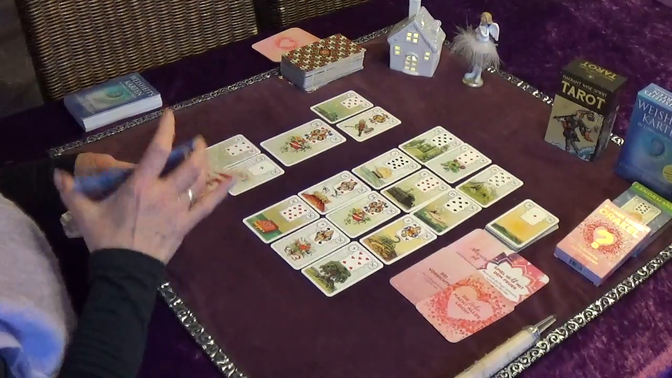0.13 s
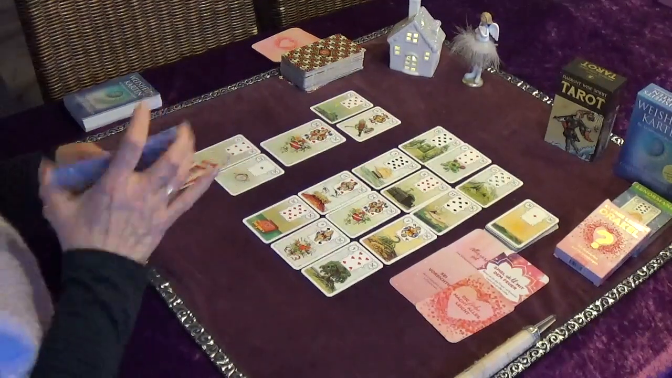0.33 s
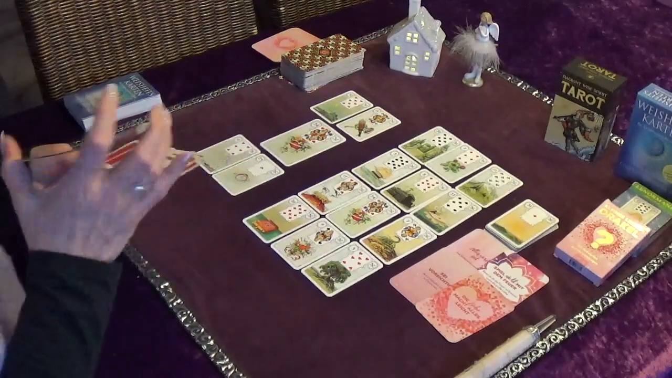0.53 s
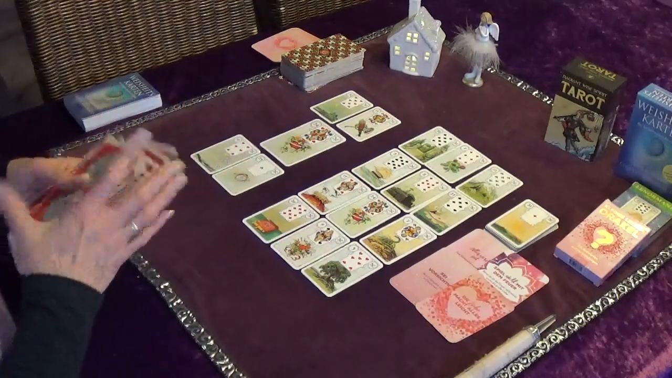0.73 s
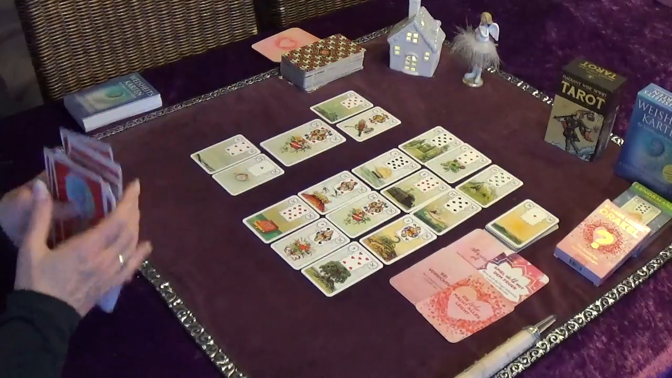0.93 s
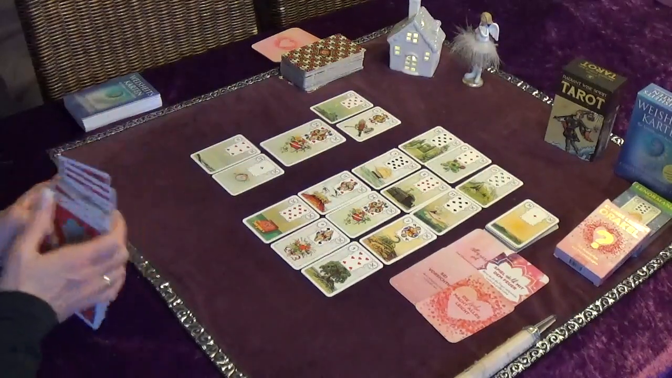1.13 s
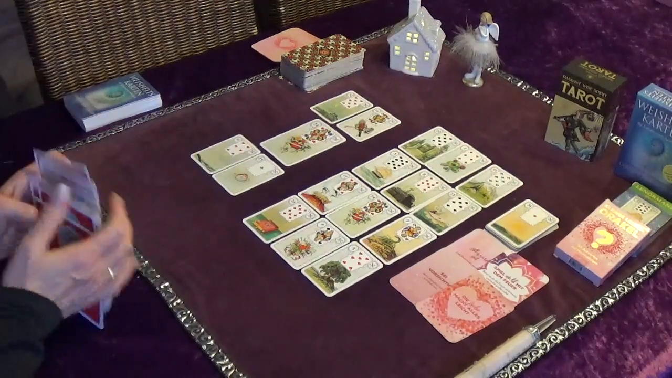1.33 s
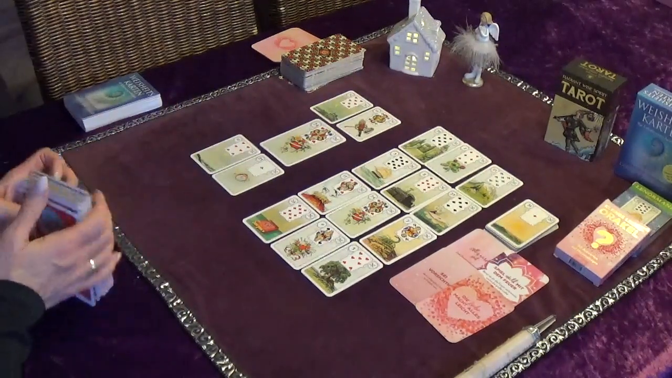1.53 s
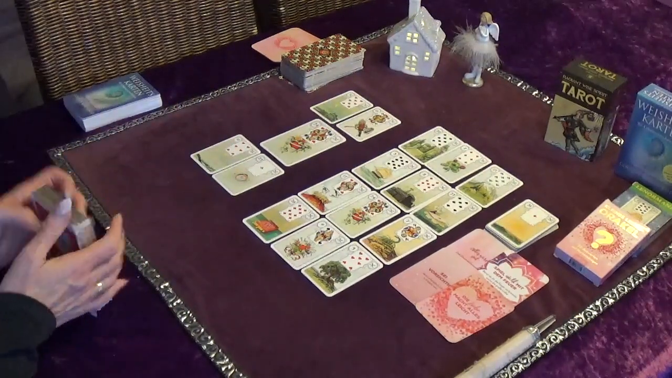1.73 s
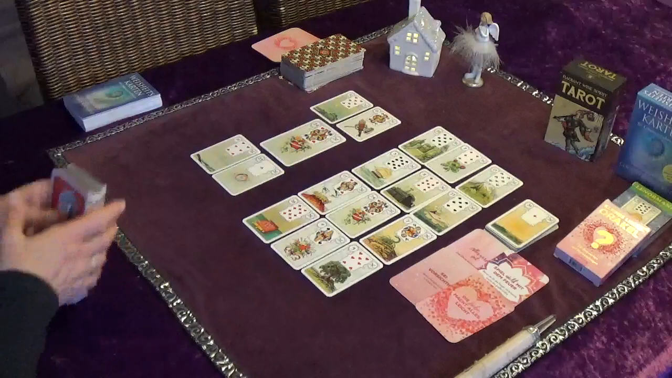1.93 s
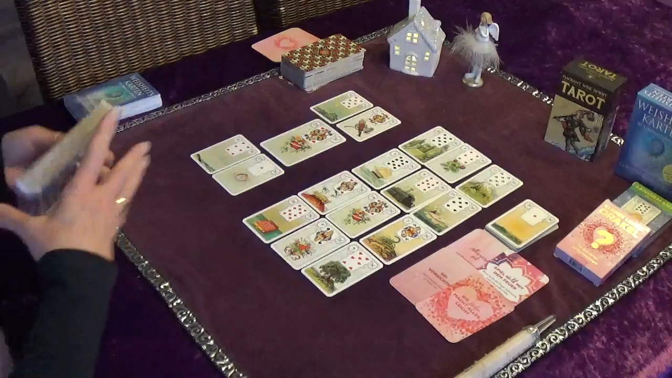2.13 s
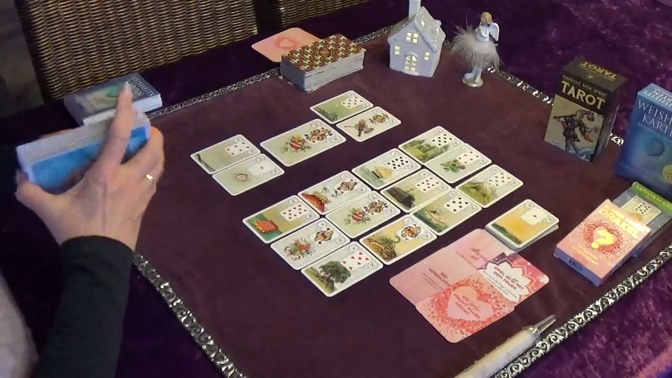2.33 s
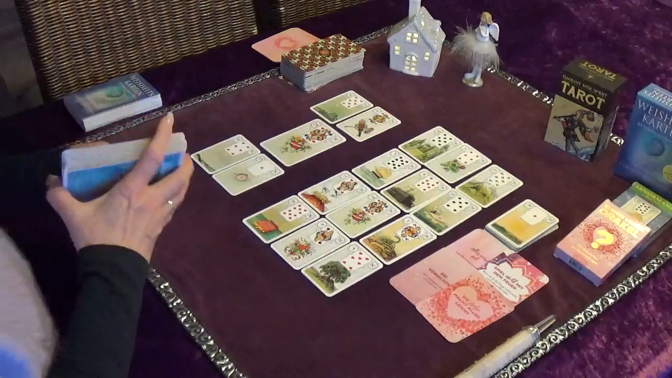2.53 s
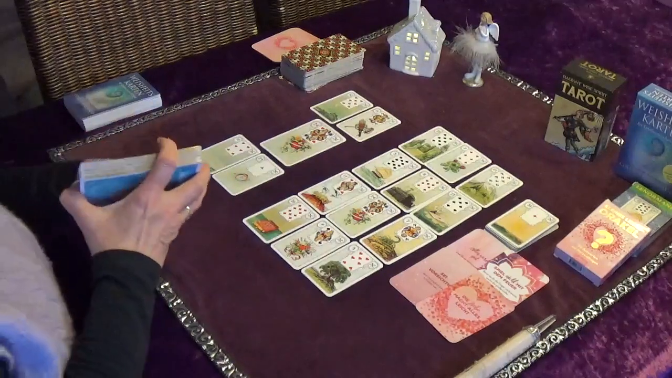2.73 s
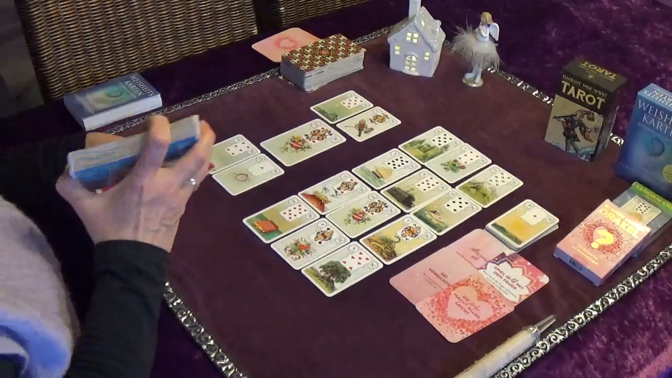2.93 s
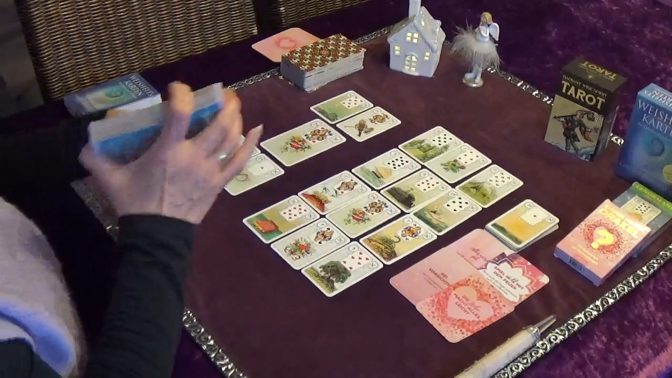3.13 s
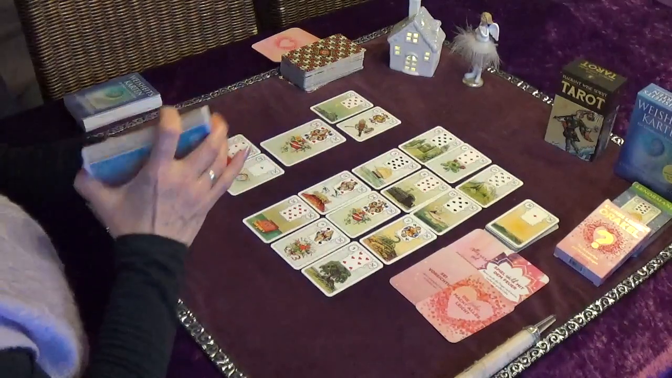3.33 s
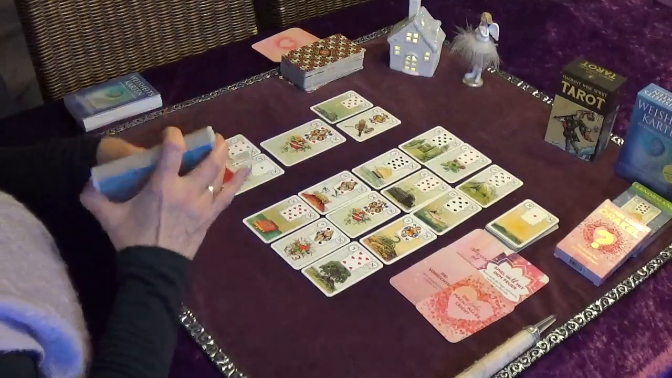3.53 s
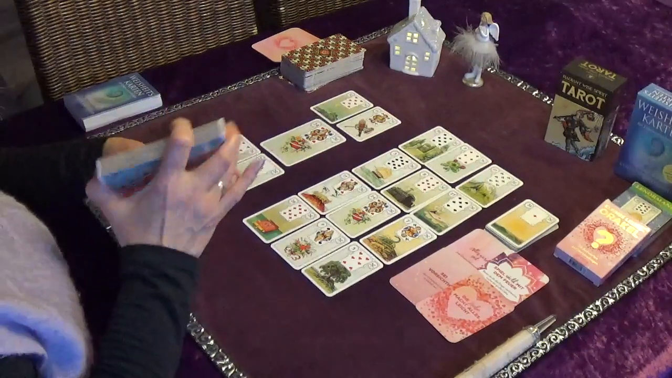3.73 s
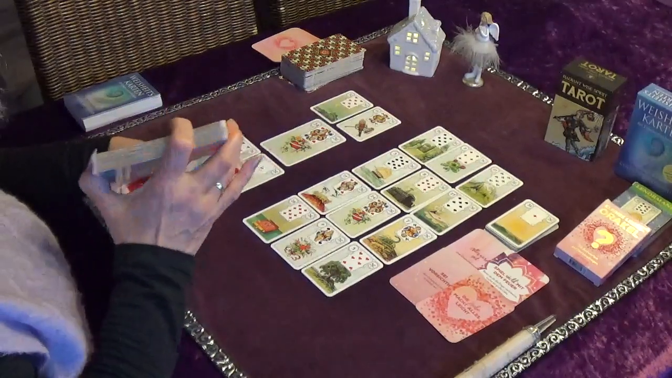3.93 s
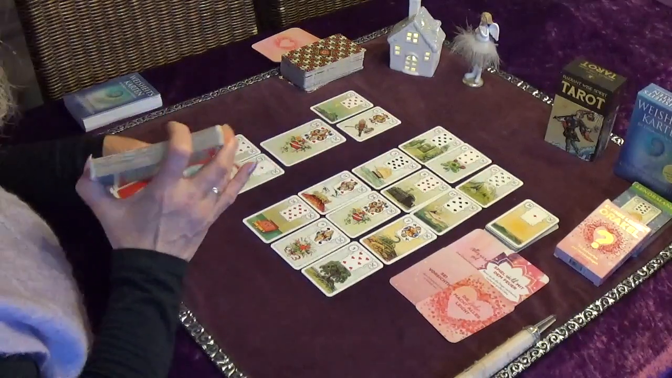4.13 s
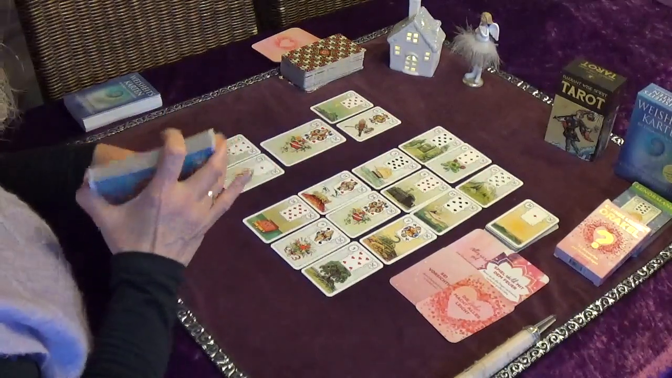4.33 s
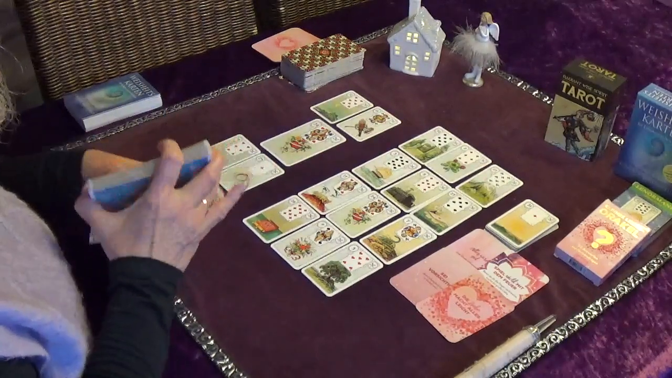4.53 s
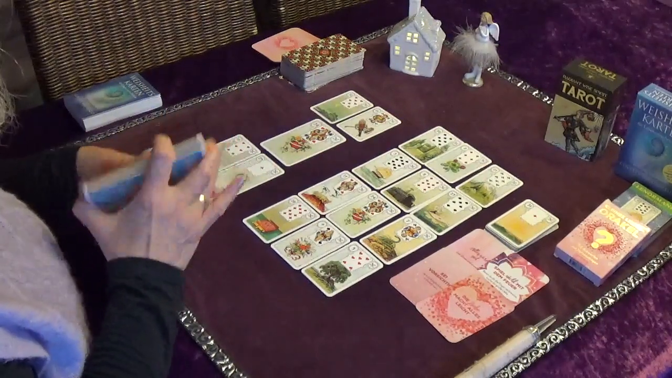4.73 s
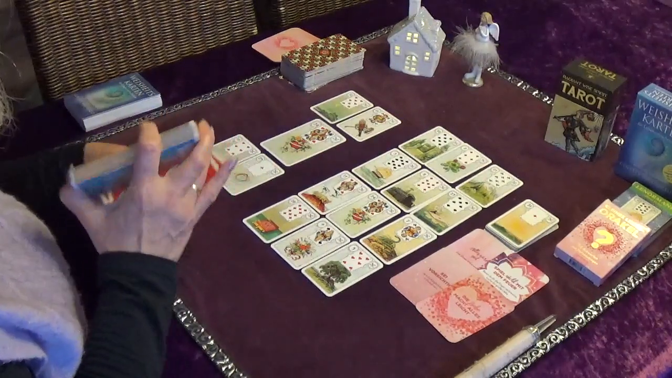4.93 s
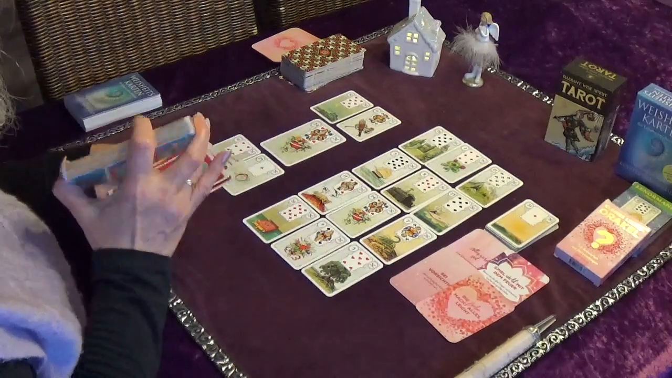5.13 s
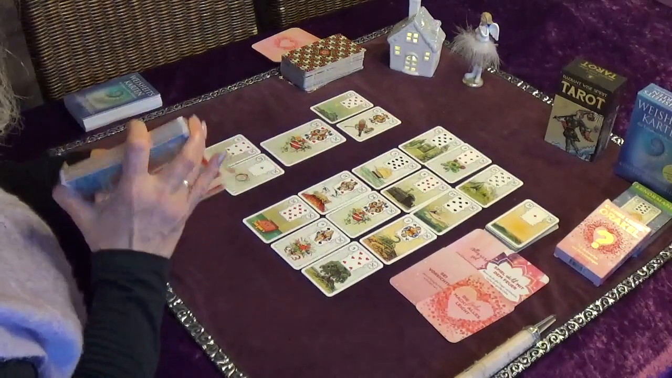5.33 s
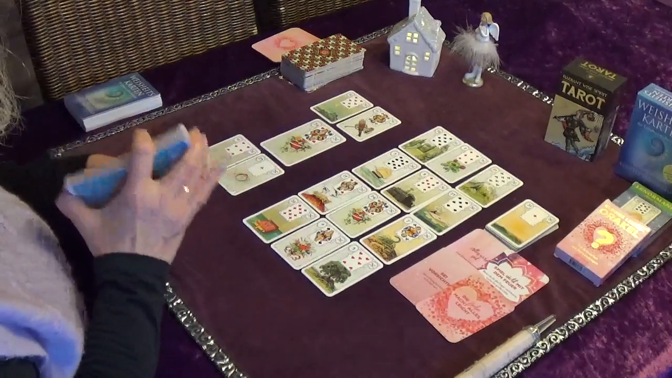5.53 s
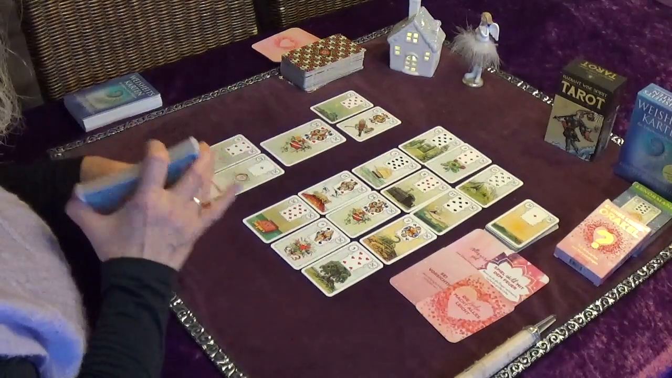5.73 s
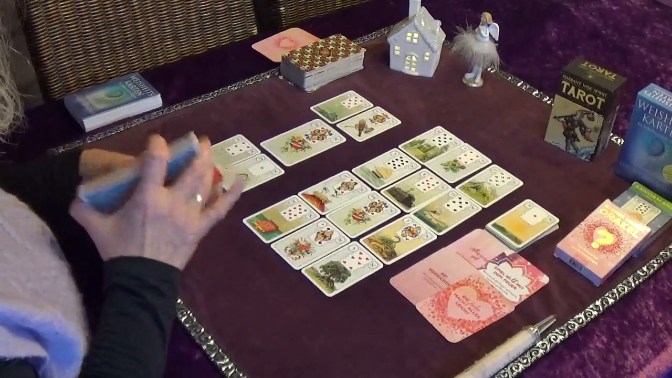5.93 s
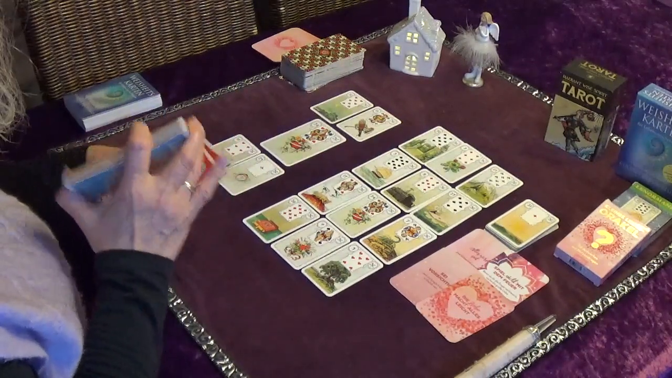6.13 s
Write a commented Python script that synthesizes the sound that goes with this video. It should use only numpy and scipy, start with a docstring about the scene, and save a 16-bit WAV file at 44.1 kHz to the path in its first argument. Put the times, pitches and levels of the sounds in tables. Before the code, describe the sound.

In a small, lively room, cards slap and slide together for a moment as someone shuffles them near the microphone. Several woody knocks follow as the deck is squared on a tabletop, then soft rubbing and a brief rest. The shuffling starts again and keeps going, a quick, regular run of crisp snaps and papery hiss over a faint low background.

```python
"""Cards rustle and snap as a deck is shuffled overhand above a cloth-covered table in a small, lively room.
In each stroke, about four a second, a packet strikes the deck edge-on, then a few cards peel off and land.
Friction makes the papery hiss, impact the snaps, and air squeezed from under the cards a falling puff.
Early on the deck is knocked square on the table, whose modes boom; after a short rest the shuffle goes on.
The table top and the walls reflect the sound over a faint rumble."""
import sys
import numpy as np
from scipy import signal
from scipy.fft import rfft, irfft, next_fast_len
from scipy.io import wavfile
from scipy.ndimage import map_coordinates

SR = 44100
rng = np.random.default_rng(int(sys.argv[2]) if len(sys.argv) > 2 else 0)


def pcm_store(signal):
    """Save signal as 16-bit PCM."""
    levels = np.round(np.clip(np.atleast_2d(signal), -1, 1) * 32767)
    wavfile.write(sys.argv[1], SR, levels.astype(np.int16).T)


N = 276590

# Spectra of the sources. Each row: frequency in Hz, relative spectral level in dB.
BACKGROUND_SPECTRUM = [(12, -37), (20, -11), (59, -2.5), (77, -17.5), (165, -9.5), (199, -4), (221, -13.5),
                       (463, -13.5), (542, -20.5), (3270, -24), (3830, -27), (7600, -28.5), (11000, -34.5),
                       (14300, -83), (22000, -120)]
TABLE_SPECTRUM = [(40, -43), (75, -22), (110, -14.5), (230, -11), (380, -4.5), (550, -4), (850, -2.5),
                  (1300, -3), (2100, -4.5), (3200, -7), (6000, -9.5), (11000, -20)]
CLACK_SPECTRUM = [(300, -26), (1200, -5), (3000, -0.5), (4200, -15.5), (6000, -24.5), (11000, -43.5)]  # card edges on the table
HISS_SPECTRUM = [(1500, -44), (3500, -3.5), (4800, 1.5), (7000, 0.5), (9300, -1), (11000, -9.5)]  # light sliding
RASP_SPECTRUM = [(50, -23), (130, -9), (300, 2.5), (550, -5), (900, -5.5), (1350, 0), (2200, -2), (3300, 0),
                 (4400, -8.5), (6500, -7.5), (11000, -39.5)]  # firm sliding
TICK_SPECTRUM = [(1500, -41.5), (3500, -0.5), (4700, 3.5), (7500, 0.5), (9500, -6), (11000, -14)]  # a packet's edges
SLAP_SPECTRUM = [(400, -52.5), (950, -7), (1300, 10), (1750, 3.5), (2300, 5), (3300, 5), (4000, -7),
                 (4700, -2.5), (6500, -29), (11000, -64)]  # its face
THUD_SPECTRUM = [(50, -22.5), (130, -18.5), (250, -6), (450, 2), (650, 0), (900, -3.5), (1150, 0),
                 (1600, -45.5), (4000, -30.5)]  # the deck in the palm
# Reverberation. Each row: frequency in Hz, time to decay by 60 dB in seconds.
ROOM_T60 = [(100, 0.64), (250, 0.52), (600, 0.41), (1500, 0.44), (3700, 0.38), (10000, 0.34)]
# Reflection from the walls. Each row: frequency in Hz, gain in dB.
WALL_GAIN = [(100, 7), (400, -1.5), (1500, -2), (3000, -4.5), (5500, -4.5), (11000, -6)]
# Width of the diffuse field. Each row: frequency in Hz, side over mid in dB.
DIFFUSE_WIDTH = [(60, -18), (190, -19), (350, -15.5), (630, -9), (1100, -5.5), (2000, -7), (4000, -7.5),
                 (10000, -5)]
# Resonances of the table. Each row: frequency in Hz, width in Hz, peak height in dB.
TABLE_RESONANCES = [(107, 29, 15), (167, 18, 9), (220, 5.8, 14), (239, 25, 11.5), (311, 24, 9),
                    (438, 7.1, 6), (477, 8.2, 8), (530, 39, 7), (680.6, 52, 11.5), (731, 24, 5.5),
                    (957, 8.3, 0.5), (980, 17, 8.5), (1106, 9.4, 8.5), (1277, 55, 0.5), (1297, 37, 10),
                    (1400, 11, 4), (1477, 18, 8.5), (1580, 69, 4.5), (1640, 21, 9), (1860, 87, 6),
                    (2100, 47, 6.5)]
# The deck knocked on the table. Each row: start in seconds, level in dB, contact cutoff in Hz, pitch
# favoured by the spot in Hz, bass from the hand's weight in dB, relative clack level in dB.
DECK_KNOCKS = [(0.99, -30.5, 2100, 321, 3.5, -9), (1.007, -29, 1550, 450, 8, -6),
               (1.361, -40, 1800, 1000, 9, -26), (1.398, -14.5, 2490, 1183, -4.5, 2),
               (1.658, -26.5, 2250, 1530, 2, -8), (1.690, -17, 2100, 1520, -1, -2),
               (1.7042, -22.5, 3000, 1480, -11, 8), (1.741, -25, 1710, 780, 1.5, -24)]
# The hands regrip the deck, or a packet drags. Each row: time of fastest motion, rise and fall in
# seconds, level in dB, rasp over hiss in dB.
HAND_RUBS = [(0.004, 0.021, 0.039, -35.5, 11.5), (0.163, 0.016, 0.0071, -38, 10),
             (0.418, 0.0054, 0.011, -33.5, 10), (0.669, 0.0061, 0.0063, -29, 0),
             (0.876, 0.022, 0.0094, -37.5, 0.5), (0.92, 0.015, 0.031, -37, -5),
             (1.049, 0.029, 0.021, -38, 4), (1.129, 0.01, 0.042, -40, 6.5),
             (1.276, 0.007, 0.039, -48.5, -4), (1.475, 0.024, 0.015, -36, 4), (1.845, 0.062, 0.08, -46, 9),
             (2.03, 0.14, 0.066, -54.5, -8), (2.287, 0.01, 0.026, -50, -2.5),
             (2.834, 0.023, 0.08, -46.5, 3.5), (3.109, 0.016, 0.008, -32.5, 1),
             (3.335, 0.01, 0.084, -44, 8), (3.6, 0.015, 0.03, -35, 7), (3.811, 0.0064, 0.013, -25.5, -6),
             (4.562, 0.0088, 0.007, -29.5, -2), (5.271, 0.0075, 0.015, -26, -0.5),
             (5.849, 0.0082, 0.024, -23.5, -28), (5.975, 0.0067, 0.018, -31, 3),
             (6.219, 0.0069, 0.008, -32, -5), (6.256, 0.0073, 0.015, -32.5, 12)]
# Single cards catch and flick free. Each row: start in seconds, level in dB, flexing pitch in Hz,
# tick over slap in dB.
CARD_FLICKS = [(0.1303, -28, 1790, -5), (0.1494, -17.8, 2800, 2.5), (0.3937, -23, 4280, 2),
               (0.6975, -20, 2860, -24), (1.0085, -35.5, 2400, 3), (1.1184, -41, 3000, 0),
               (1.855, -36.5, 1480, 5), (2.073, -42.5, 4300, 8), (2.278, -40.5, 4300, 18),
               (2.5163, -51.5, 1200, -7), (2.7209, -51.5, 1300, 4), (3.3512, -22.5, 2490, -4),
               (3.377, -23.5, 1130, -14), (4.0778, -25.5, 1710, -6), (4.1663, -30, 2620, 10),
               (4.3228, -32.5, 2300, -14), (4.6667, -17, 4300, 11), (5.049, -23, 4300, 9),
               (5.0592, -26, 2000, -1), (5.31, -25, 2630, -20), (5.3315, -26, 1990, -20),
               (5.5277, -19.5, 4400, -3), (5.7443, -20, 3460, 8), (5.7709, -25, 4360, -5)]
# A packet strikes edge-on and scrapes in; if tilted, a corner touches first. Each row: start in
# seconds, level in dB, flexing pitch in Hz, tick over slap in dB, relative thud in dB, lead of the
# corner in seconds, scrape level in dB.
EDGE_STRIKES = [(0.1222, -18, 3150, 2.5, -16, 0.0035, -27), (0.3816, -17, 4150, 7, -24, 0, -37.5),
                (0.6567, -34, 1400, 0, -17, 0.0021, -51), (3.0636, -30.5, 3310, 3, -1.5, 0.007, -30.5),
                (3.302, -20.5, 3700, -1, -5.5, 0, -58), (3.5566, -16.5, 1420, -6.5, -2.5, 0.009, -23.5),
                (3.8217, -19, 1720, -3, -8, 0.005, -29.5), (4.058, -16.5, 1760, -4, -12, 0.005, -26.5),
                (4.2902, -23, 4300, 4, -8, 0.0057, -30), (4.5432, -18, 3040, 1, -14.5, 0, -30),
                (4.7934, -20, 1420, -3.5, -7, 0.012, -29), (5.0269, -22.5, 4300, 10, -11, 0.004, -23.5),
                (5.2857, -15, 2030, -20, -13.5, 0.019, -31), (5.5034, -20, 4300, 10, -14, 0.004, -26.5),
                (5.7405, -18.5, 3540, 1, -16, 0, -35), (6.0111, -19, 3140, -8, -15.5, 0.004, -33.5),
                (6.2266, -31, 1480, 3, -6, 0, -39)]
# Cards peel off, slide down and land flat. Each row: landing time in seconds, level in dB, flexing
# pitch in Hz, tick over slap in dB, levels of peel, slide and escaping air in dB, settling time in
# seconds, relative thud on settling in dB.
FLAT_LANDINGS = [(0.264, -29, 2390, -9, -34, -35, -57, 0.0021, 3),
                 (0.518, -24, 1790, -31, -41, -32, -59, 0.0019, -12),
                 (0.6891, -15.5, 4300, -2.5, -71, -41, -57, 0.003, 1),
                 (2.9304, -21, 2540, -18, -49, -38, -38, 0.0051, 5),
                 (3.1949, -21.5, 2900, -32, -41.5, -36, -38.5, 0.013, -6.5),
                 (3.6886, -19, 3000, -2, -34, -31, -34, 0.0044, 3.5),
                 (3.9216, -19.5, 1120, -5, -35.5, -33, -31, 0.005, -1.5),
                 (4.1781, -16.5, 2720, -5, -42.5, -33.5, -32, 0.0101, -6),
                 (4.4099, -16, 2300, -13, -44, -26, -28.5, 0.0085, -3.5),
                 (4.6598, -17.5, 2160, -22, -39, -30.5, -33, 0.0069, -3.5),
                 (4.9103, -15.5, 2130, -10, -36, -30, -33.5, 0.0066, -0.5),
                 (5.1558, -15, 2400, -7, -35, -28.5, -34, 0.0083, -4),
                 (5.383, -17.5, 2460, -15, -37.5, -31, -26, 0.0068, -1.5),
                 (5.62, -15.5, 2130, -5.5, -39, -24.5, -31, 0.0077, 0.5),
                 (5.8681, -17.5, 2170, -24, -39, -27.5, -36, 0.011, -3.5),
                 (6.1065, -15, 2330, -5, -39.5, -28.5, -30, 0.0074, -3.5)]


def amp(db):
    """Amplitude ratio of a level in decibels."""
    return 10 ** (np.asarray(db) / 20)


def unit_rms(x):
    """Normalisation to a mean power of 1."""
    return x / np.sqrt(np.mean(x ** 2) + 1e-20)


def curve_at(points, hz):
    """Interpolation of (Hz, value) points on a logarithmic frequency axis."""
    frequencies, values = np.transpose(points)
    return np.interp(np.log(hz + 1), np.log(frequencies + 1), values)


def resonance(hz, centre, octaves):
    """A resonance peak of height 1, Gaussian in log frequency."""
    return np.exp(-.5 * (np.log2((hz + 1) / centre) / octaves) ** 2)


def split_power(db):
    """Two gains whose powers sum to 1, the second db above the first."""
    first = 1 / np.sqrt(1 + amp(db) ** 2)
    return first, first * amp(db)


def add(track, start_s, x):
    """Superposition: x is summed into the track from start_s."""
    part = track[..., max(round(start_s * SR), 0):][..., :x.shape[-1]]
    part += x[..., :part.shape[-1]]


def causal_filter(x, gain):
    """Minimum-phase filtering: the magnitude gain(Hz) sets the phase through the folded cepstrum."""
    n = x.shape[-1]
    size = 2 * next_fast_len(n // 2 + 1024)
    magnitude = np.maximum(gain(np.fft.rfftfreq(size, 1 / SR)), 1e-6)
    cepstrum = irfft(np.log(magnitude))
    cepstrum[1:size // 2] *= 2
    cepstrum[size // 2 + 1:] = 0
    return irfft(rfft(x, size) * np.exp(rfft(cepstrum)), size)[..., :n]


def coloured(x, spectrum):
    """Spectral shaping by a curve of (Hz, dB) points."""
    return causal_filter(x, lambda hz: amp(curve_at(spectrum, hz)))


def diffuse(pair):
    """A diffuse field is nearly coherent in the bass: unrelated mid and side become left and right."""
    side = coloured(pair[1], DIFFUSE_WIDTH)
    return np.array([pair[0] + side, pair[0] - side])


def background():
    """Stationary noise: the quiet room's rumble and the microphone's hiss."""
    return unit_rms(coloured(diffuse(rng.standard_normal((2, N))), BACKGROUND_SPECTRUM))


def decaying_noise(hold_s, stretch=1):
    """Absorption: two noises hold, then decay in each band with the room's time multiplied by stretch."""
    hz, t, bands = signal.stft(rng.standard_normal((2, SR // 2)), SR, nperseg=256)
    t60 = stretch * curve_at(ROOM_T60, hz)[:, None]
    decay = amp(-60 * np.maximum(t - hold_s, 0) / t60)
    return signal.istft(bands * decay, SR, nperseg=256)[1]


def wall_reverberation(x, gap_s):
    """Convolution with the room's response, drawn anew for each block because the hands move."""
    out = np.zeros((2, N))
    block = SR // 14
    for start in range(0, N, block):
        response = decaying_noise(hold_s=0.0012)
        response /= np.linalg.norm(response[0])
        add(out, start / SR + gap_s, signal.fftconvolve(x[None, start:start + block], response, axes=1))
    return coloured(diffuse(out), WALL_GAIN)


def table_echo(x, delay_s, right_lag_s):
    """Specular reflection from the table top, arriving slightly later on the right."""
    out = np.zeros((2, N))
    add(out[0], delay_s, x)
    add(out[1], delay_s + right_lag_s, x)
    return out


def impact(spectrum, t60, push, pitch_hz=1000, ring_db=0):
    """Source and filter: an impulsive push and decaying chatter drive a spectrum with an optional peak."""
    t = np.arange(SR // 20) / SR
    chatter = rng.standard_normal(len(t)) * amp(-60 * t / t60)
    force = chatter / np.linalg.norm(chatter) - push * (t == 0)
    gain = lambda hz: amp(curve_at(spectrum, hz) + ring_db * resonance(hz, pitch_hz, octaves=0.3))
    sound = causal_filter(force, gain)
    return sound / np.linalg.norm(sound) * np.sqrt(.003 * SR)  # the energy of 3 ms at rms 1


def table_knocks():
    """Impact excites the table's dense modes; a softer contact is duller, a heavier hand deeper."""
    out = np.zeros((2, N))
    for start, db, cutoff_hz, spot_hz, weight_db, clack_db in DECK_KNOCKS:
        def gain(hz):
            modes_db = sum(peak_db / (1 + (2 * (hz - centre) / width) ** 2)
                           for centre, width, peak_db in TABLE_RESONANCES)
            spot_db = 6.3 * resonance(hz, spot_hz, octaves=0.1)
            bass_db = weight_db / (1 + (hz / 400) ** 2)
            contact = amp(-33) + 1 / np.sqrt(1 + (hz / cutoff_hz) ** 11)
            return amp(curve_at(TABLE_SPECTRUM, hz) + modes_db + spot_db + bass_db) * contact

        boom = causal_filter(diffuse(decaying_noise(hold_s=0.041, stretch=1.064)), gain)
        add(out, start, amp(db) * boom / boom[:, :SR // 20].std())
        add(out, start, amp(db + clack_db) * impact(CLACK_SPECTRUM, t60=0.061, push=0.22))
    return out


def air_puffs(start_hz=10500, landing_hz=2400, closing_s=0.017, cycles_per_eddy=1.6):
    """Air squeezed from under a falling packet excites the gap's resonance, which sinks as it closes."""
    out = np.zeros(N)
    duration = closing_s * np.log(start_hz / landing_hz)
    t = np.arange(int(duration * SR)) / SR
    cycles = np.cumsum(start_hz * np.exp(-t / closing_s)) / SR
    swell = (t / duration) ** 1.05 * np.clip((duration - t) / 0.0036, 0, 1)
    for landing, *_, air_db, _, _ in FLAT_LANDINGS:
        # each eddy gives the resonance a new amplitude and phase
        in_phase, quadrature = (map_coordinates(eddies, [cycles / cycles_per_eddy], mode="mirror")
                                for eddies in rng.standard_normal((2, 256)))
        puff = in_phase * np.cos(2 * np.pi * cycles) + quadrature * np.sin(2 * np.pi * cycles)
        add(out, landing - duration, amp(air_db) * unit_rms(puff * swell))
    return out


def paper_friction(spectrum, catches_per_s):
    """Stick-slip friction: a smooth rush with tiny catches, a few much larger than the rest."""
    catches = (rng.random(N) < catches_per_s / SR) * rng.laplace(size=N)
    return unit_rms(coloured(rng.standard_normal(N) + unit_rms(catches), spectrum))


def sliding_motions(peel_lead_s=0.053, slide_lead_s=0.0099):
    """Sliding contact: the scrapes, peels, last slides and rubs, in rows like those of HAND_RUBS."""
    rows = [(start, 0.0025, 0.014, scrape_db, 2.7) for start, *_, scrape_db in EDGE_STRIKES]
    for landing, _, _, _, peel_db, slide_db, *_ in FLAT_LANDINGS:
        rows.append((landing - peel_lead_s, 0.019, 0.033, peel_db, 0.35))
        rows.append((landing - slide_lead_s, 0.012, 0.015, slide_db, -1.5))
    return rows + HAND_RUBS


def card_slides():
    """Friction noise swells and fades with speed; firm pressure rasps, a light touch hisses."""
    t = np.arange(0, N, 32) / SR
    power = np.zeros((2, len(t)))
    for peak, rise, fall, db, rasp_db in sliding_motions():
        from_peak = np.abs((t - peak) / np.where(t < peak, rise, fall))
        speed = np.exp(-from_peak ** 1.5)
        power += np.outer(split_power(rasp_db), amp(db) * speed) ** 2  # incoherent sources add in power
    hiss_gain, rasp_gain = (np.interp(np.arange(N) / SR, t, np.sqrt(p)) for p in power)
    hiss = hiss_gain * paper_friction(HISS_SPECTRUM, catches_per_s=2200)
    rasp = rasp_gain * paper_friction(RASP_SPECTRUM, catches_per_s=800)
    return hiss + rasp


def card_contacts(corner_hz=3200, far_edge_hz=960):
    """Packets collide in two stages, single cards in one. Rows as in CARD_FLICKS, plus thud in dB."""
    rows = [(*flick, -12) for flick in CARD_FLICKS]  # one card hardly shakes the hand
    for start, db, pitch_hz, tick_db, thud_db, lead_s, _ in EDGE_STRIKES:
        rows.append((start - lead_s, db - 11, corner_hz, 0, -7))
        rows.append((start, db, pitch_hz, tick_db, thud_db))
    for landing, db, pitch_hz, tick_db, *_, settle_s, thud_db in FLAT_LANDINGS:
        rows.append((landing, db, pitch_hz, tick_db, -8.5))
        rows.append((landing + settle_s, db - 6.5, far_edge_hz, -1.7, thud_db))
    return rows


def card_snaps(push):
    """Impact sound: edges tick, the face slaps, the deck thuds; push weights impulse against chatter."""
    out = np.zeros(N)
    for start, db, pitch_hz, tick_db, thud_db in card_contacts():
        slap_gain, tick_gain = split_power(tick_db)
        ring_db = 11.6 * slap_gain ** 2  # a flatter landing rings more and ticks less
        slap = impact(SLAP_SPECTRUM, t60=0.019, push=0.75 * push, pitch_hz=pitch_hz, ring_db=ring_db)
        tick = impact(TICK_SPECTRUM, t60=0.01, push=0.43 * push)
        thud = impact(THUD_SPECTRUM, t60=0.064, push=0.71 * push)
        add(out, start, amp(db) * (slap_gain * slap + tick_gain * tick))
        add(out, start + 0.00032, amp(db + thud_db) * thud)
    return out


def scene():
    """Superposition of the cards' direct and reflected sound, the knocks and the background."""
    rustle = card_slides() + air_puffs()
    cards = card_snaps(push=1) + rustle
    direct = cards * amp([[.4], [-.4]])  # slightly left of centre
    echo = amp(-17) * table_echo(cards, delay_s=.0026, right_lag_s=.0001)
    # the walls gather a snap from all directions, so its chatter evens out
    radiated = card_snaps(push=3.1) + rustle
    reverberation = amp(-2.5) * wall_reverberation(radiated, gap_s=.006)
    return direct + echo + reverberation + table_knocks() + amp(-55) * background()


def record(dry):
    """Band limiting: a steep low-pass filter removes the highest treble."""
    cutoff_hz = 11100
    size = next_fast_len(N + SR // 2)
    hz = np.fft.rfftfreq(size, 1 / SR)
    return irfft(rfft(dry, size) / np.sqrt(1 + (hz / cutoff_hz) ** 160), size)[:, :N]


dry = scene()
out = record(dry)
pcm_store(out)
```